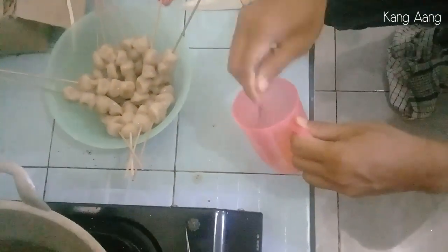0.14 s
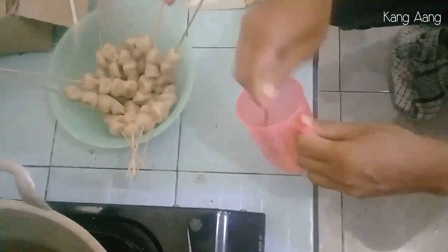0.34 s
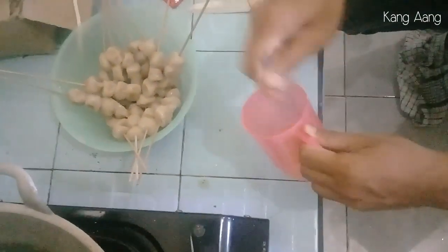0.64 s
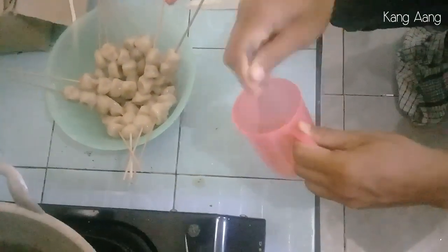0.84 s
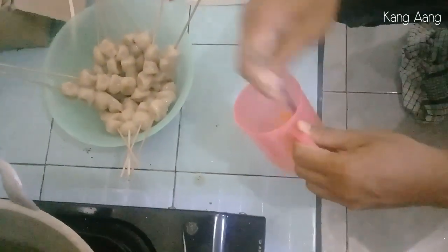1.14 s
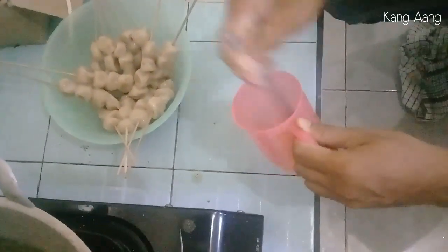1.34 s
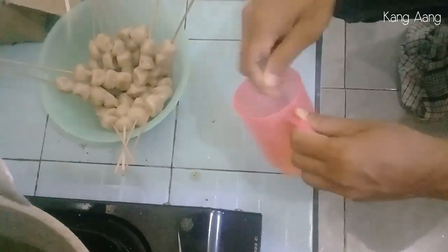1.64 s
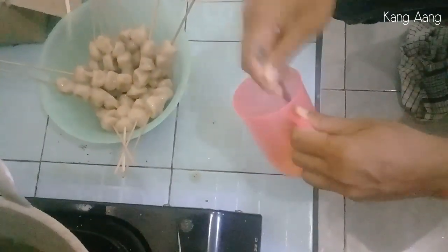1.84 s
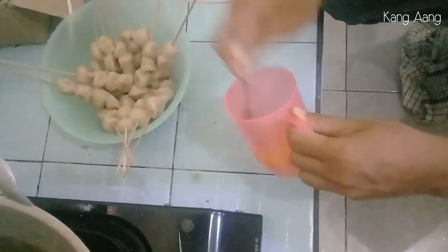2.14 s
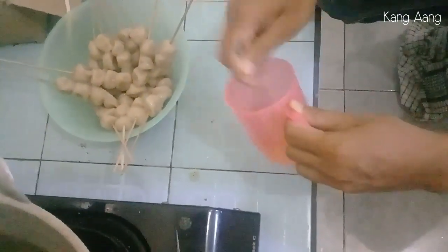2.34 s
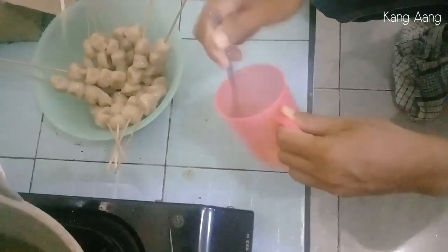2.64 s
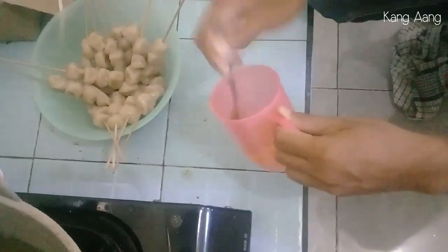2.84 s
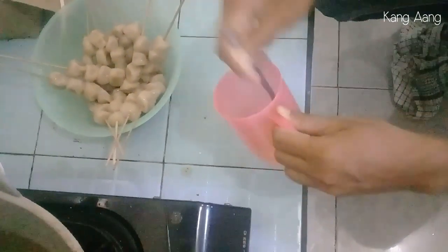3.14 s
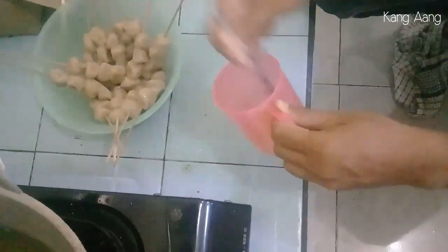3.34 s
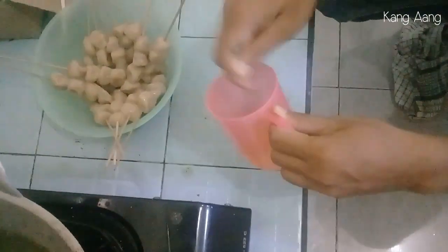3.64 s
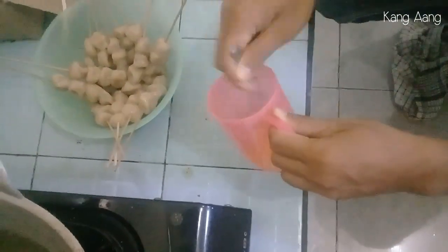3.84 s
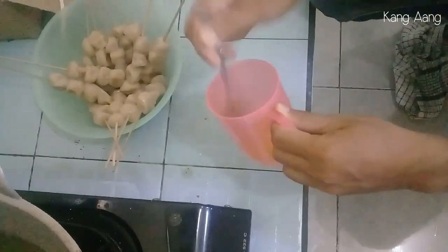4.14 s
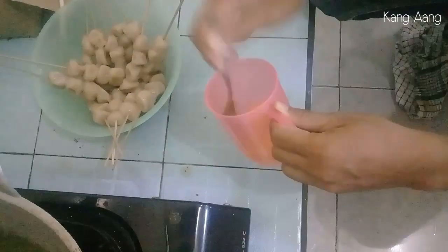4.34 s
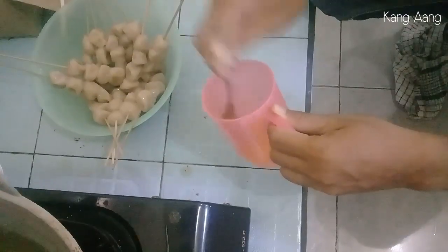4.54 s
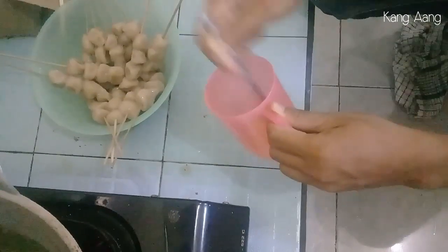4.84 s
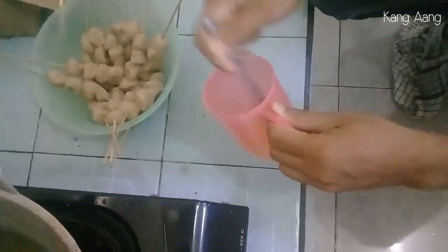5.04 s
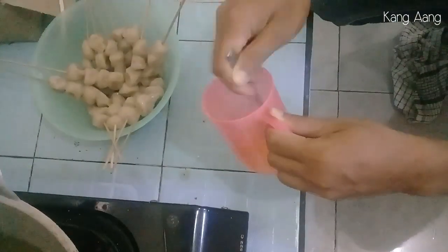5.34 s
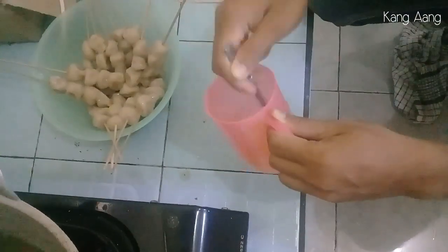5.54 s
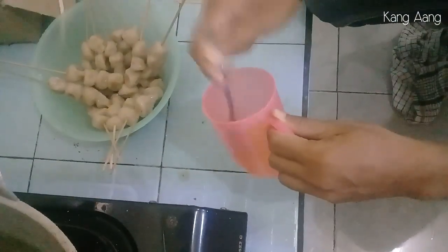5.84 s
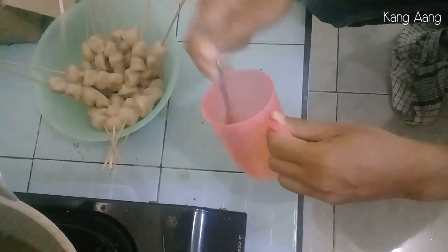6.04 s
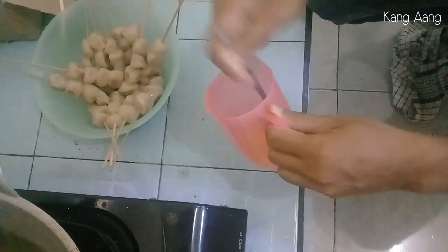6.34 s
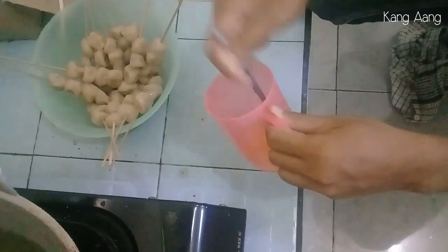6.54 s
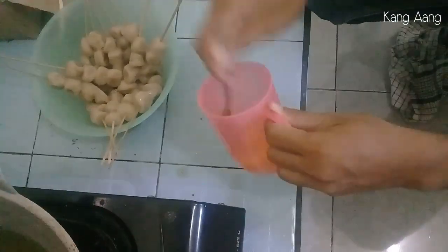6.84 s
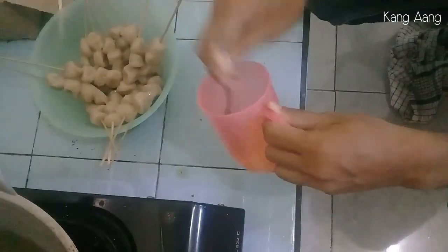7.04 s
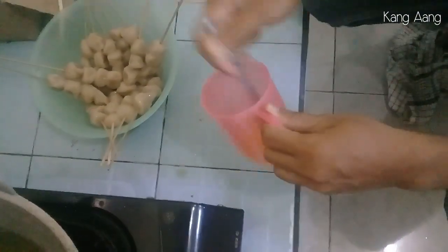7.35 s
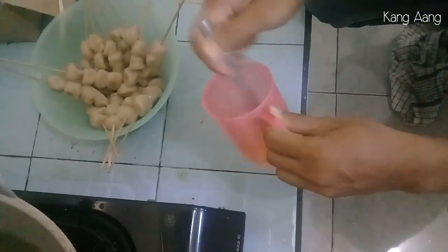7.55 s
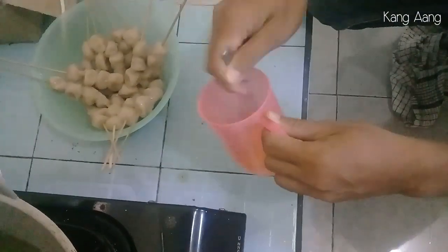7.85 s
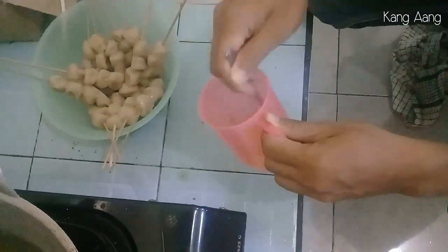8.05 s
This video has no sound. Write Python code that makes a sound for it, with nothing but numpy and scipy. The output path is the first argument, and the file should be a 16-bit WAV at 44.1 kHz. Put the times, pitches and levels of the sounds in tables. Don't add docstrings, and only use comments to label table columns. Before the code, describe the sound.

A fork beats egg in a handheld plastic cup, heard close up in a small tiled kitchen. Around five strokes a second knock the wall with dull plastic clacks and faint steel ticks, each pumping a hollow mid-pitched hoot from the cup. Wet plops, slaps and swishes fill the gaps. The pace stays steady throughout, slightly softer near the end, over a faint house hush.

```python
import sys
import numpy as np
from scipy import signal
from scipy.fft import rfft, irfft
from scipy.io import wavfile
from scipy.ndimage import uniform_filter1d

SR = 44100
rng = np.random.default_rng(int(sys.argv[2]) if len(sys.argv) > 2 else 0)


def master_out(mix):
    frames = np.transpose(np.atleast_2d(mix))
    ceiling = np.clip(frames, -1, 1)
    pcm = np.round(ceiling * 32767).astype(np.int16)
    wavfile.write(sys.argv[1], SR, pcm)


def voltage_ratio(decibels):
    exponent = np.asarray(decibels, float) / 20
    return 10 ** exponent


N = 360738
TOUCH = np.arange(2048) / SR

# [f/Hz, level/dB per Hz]
HUSH = [(15, -30), (30, -6), (70, 8.5), (160, 8.5), (500, -6.5), (2500, -6.5), (4300, -6.5), (12000, -18),
        (16000, -36)]
# [f/Hz, level/dB, t60/s]
KITCHEN = [(154, -59, 0.39), (261, -22.5, 0.45), (616, -17.5, 0.42), (1130, -20.5, 0.44), (2400, -32, 0.85),
           (4080, -23, 0.54), (9950, -56, 0.1)]
# [f/Hz, level/dB, t60/s]
BOOM = [(158.7, -64, 0.24), (209, -54.5, 0.96), (266.5, -46.5, 0.51), (407, -66, .4)]
# [t/s, f/Hz]
GRIP = [
    (0, 90),
    (2, 75),
    (4, 86),
    (5.35, 68),
    (5.7, 123),
    (6.15, 123),
    (6.5, 95),
    (8.2, 90),
]
# [t/s, peak level/dB, f/Hz]
SINGS = [
    (.2115, -26, 3020),
    (6.69, -21.5, 2890),
    (0.93, -48, 4500),
    (8.1, -44, 720),
    (1.108, -33, 1100),
]
# [t/s, effort level/dB, gurgle level/dB, air column f/Hz as the cup tilts (not used in the sound)]
SLOSH = [(0.0, 3, -63, 720), (.18, -1, -33.5, 686), (.34, 12.5, -43.5, 656.6), (1.32, -25, -51, 702.8),
         (1.5, -3.5, -32.5, 697.4), (1.96, -2, -38, 685), (3.05, -19, -38, 711), (3.48, 1, -36, 677.6),
         (4.67, 2.5, -35.5, 700.3), (5.06, 1, -44, 707), (5.439, -20, -38, 665), (5.97, 5, -46, 653),
         (6.15, -20, -88, 697), (6.31, -29, -38, 689.4), (7.38, -3, -43.5, 713), (8.18, -7, -48.5, 725)]
# [f/Hz, level/dB]
WALL = [(1080, -6.5), (1290, -47), (1500, -11), (1730, -0.5), (2060, 5), (2360, 10), (2600, -4.5),
        (2900, 8.5), (3100, -1), (3400, -1), (3800, 7)]
# [f/Hz, level/dB, t60/s]
HOOT = [(620, -29, 0.63), (669, -9.5, 0.18), (665, -8, 0.18), (708, -5, 0.21), (735, -15, 0.19),
        (796, -13.5, 0.61), (793, -10, 0.21), (829, -3.5, 0.21), (897, -2.5, 0.18), (963, -15, 0.69)]
# [f/Hz, level/dB, t60/s, swing direction]
NOOK = [(602.4, -34, .6, 1), (648.1, -16.8, .225, 1), (663.2, -24.4, .46, 1), (672.8, -23.8, .7, -1),
        (682.5, -20.1, .26, 1), (708, -30.1, .7, -1), (712.4, 0, .084, -1), (715.1, -6.1, .183, 1),
        (724.8, -21.7, .7, 1), (747.7, -9, .7, 1), (747.8, -8.9, .565, -1), (766.6, -30.1, .7, -1),
        (774.7, -35.4, .7, -1), (827.7, -40.5, .58, 1)]
# [f/Hz, level/dB, t60/s]
THUD = [(148, -47, 0.025), (283, -13, 0.11), (348, 6, 0.011)]
# [f/Hz, level/dB per Hz]
BRIGHT = [(2350, -1), (4000, -6), (4220, -4.5), (8700, -2.5), (9680, -7.5), (11800, -5.5), (13600, -14.5),
          (15300, -10.5), (16100, -45), (16500, -38)]
# [t/s, knock level/dB, knock centre f/Hz, steel tick level/dB, air pump level/dB]
STROKES = [(0.2102, -5.5, 2400, -25, -17.5), (.7023, -10.5, 1980, -25.5, -14),
           (.7492, -14, 2010, -25.5, -11.5), (0.9284, -10, 2450, -26.5, -10.5),
           (1.1065, -13, 1520, -26, -14.5), (1.284, -12.5, 2220, -23, -10.5),
           (1.3044, -10, 1870, -30.5, -19), (1.4625, -5.5, 2000, -21, -14.5), (1.6403, -7, 1700, -26, -9.5),
           (1.8332, -10, 2150, -28.5, -22.5), (2.0059, -9, 2230, -23, -15.5),
           (2.1904, -6, 2080, -23.5, -16.5), (2.3735, -4.5, 1830, -27, -12.5),
           (2.5502, -7.5, 1500, -24, -14.5), (2.7206, -13.5, 1620, -24, -19),
           (2.9072, -12, 1960, -25.5, -15), (3.0913, -1.5, 3030, -20, -28),
           (3.2864, -6.5, 2260, -21.5, -13.5), (3.4765, -12, 2150, -25.5, -12.5),
           (3.6643, -11, 2260, -29, -15), (3.847, -18.5, 2470, -24, -12), (4.0338, -8, 2400, -27.5, -13),
           (4.2218, -13.5, 1920, -27.5, -18), (4.4094, -4.5, 2200, -25, -13),
                (4.5955, -6.5, 2600, -24, -18.5), (4.783, -12, 2360, -24.5, -15),
                (4.974, -15, 3200, -25, -29), (5.1617, -7, 1730, -24.5, -15.5),
                (5.3458, -8.5, 1810, -28, -19.5), (5.5323, -8.5, 2400, -26, -20.5),
                (5.7223, -14.5, 2860, -33, -24.5), (5.7411, -10.5, 2150, -28.5, -59),
                (5.9191, -11, 2550, -26.5, -57), (6.0945, -11, 2150, -32, -20.5),
                (6.1328, -4.5, 2400, -20.5, -45), (6.3355, -4, 2400, -26.5, -29.5),
                (6.4936, -12.5, 2580, -29.5, -14.5), (6.6891, -6, 2900, -33, -21.5),
                (6.8768, -15, 2600, -29, -20), (7.0788, -17.5, 2720, -27, -27),
                (7.2744, -12.5, 2620, -22, -20.5), (7.4684, -20, 3020, -27, -32.5),
                (7.6485, -15.5, 2730, -26, -23.5), (7.849, -21, 3070, -27.5, -44),
                (8.0417, -15.5, 2360, -31, -28)]
# [t/s, air column f/Hz, plop level/dB, jolt level/dB, splash level/dB]
WAKES = [(0.21, 710, -23, -55, -31.5), (0.7, 691.3, -24, -40.5, -33.5), (0.75, 673, -21.5, -56, -34),
         (0.93, 676, -21, -60, -30.5), (1.11, 683, -21, -49, -33.5), (1.28, 728, -47, -68, -31),
         (1.3, 743.5, -28, -45, -33), (1.46, 735, -51, -47, -27.5), (1.64, 686, -19.5, -47, -32),
         (1.83, 670, -23.5, -47, -36), (2.01, 695, -19.5, -41, -28.5), (2.19, 696, -19.5, -46, -31.5),
         (2.37, 697, -41, -40.5, -28.5), (2.55, 687, -24.5, -43, -29.5), (2.72, 660, -27, -41, -30.5),
         (2.91, 707, -19, -47.5, -33), (3.09, 698, -28, -43, -25.5), (3.29, 704, -26.5, -49, -27),
         (3.48, 735, -20, -47, -36.5), (3.66, 699.5, -21, -51, -33), (3.85, 696, -22, -41, -36.5),
         (4.03, 678.6, -19, -46, -32.5),
         (4.22, 708, -24, -43, -34), (4.41, 706, -21, -51, -49), (4.6, 694.4, -21.5, -40, -32),
              (4.78, 691, -22, -59, -35), (4.97, 730, -47, -46, -35.5), (5.16, 714, -26, -42, -32),
              (5.35, 686, -24.5, -48, -32), (5.53, 678, -29, -46, -33), (5.72, 693, -62, -37, -32.5),
              (5.74, 734, -38, -49, -50), (5.92, 686, -39, -46, -40.5), (6.09, 693, -38, -51, -31),
              (6.13, 696, -29.5, -42, -26.5), (6.34, 725, -25, -43, -37), (6.49, 700.6, -28, -47, -33.5),
              (6.69, 702, -29.5, -43, -32.5), (6.88, 690, -25, -41, -34), (7.08, 734, -27.5, -41, -36.5),
              (7.27, 720, -21, -52, -34.5), (7.47, 719, -36, -48, -39), (7.65, 720, -33, -48, -37),
              (7.85, 720, -40, -58, -35.5), (8.04, 694, -29.5, -64, -33.5)]
# [t/s, knock level/dB, steel tick level/dB]
DIPS = [(0.0254, -33, -39), (0.3425, -20.5, -31), (0.4363, -24, -45), (0.5305, -26, -39), (1.093, -33, -32),
        (1.6057, -37, -38), (1.9739, -21, -36), (2.158, -24, -46), (2.3372, -24.5, -40), (2.358, -17, -31),
        (2.5176, -24, -39), (2.6779, -22.5, -39), (2.8589, -24.5, -37), (2.893, -23.5, -34),
        (3.0555, -30, -45), (3.6184, -25.5, -39), (4.2079, -20, -32), (4.3673, -24, -40), (4.748, -25, -36),
        (4.935, -26, -39), (6.1218, -30, -38), (6.4405, -20.5, -31.5), (6.6386, -25.5, -37.5),
        (6.6765, -24, -28), (6.842, -27.5, -37), (7.0445, -28.5, -38), (7.433, -29, -49),
        (7.6225, -26, -33), (7.805, -27.5, -52), (7.9992, -30.5, -48)]
# [t/s, knock level/dB, knock centre f/Hz, steel tick level/dB]
GRAZES = [(0.154, -24, 2150, -35), (0.2332, -25, 2920, -63), (.379, -27, 2210, -31),
          (.393, -22.5, 2320, -29), (0.043, -28, 2410, -39), (0.883, -32, 2020, -63), (.48, -29, 1910, -37),
          (.56, -27, 2010, -34), (0.634, -27, 2150, -41), (3.25, -27, 2520, -41), (4.182, -25, 2500, -37),
          (4.402, -19, 2220, -36), (4.646, -25, 2250, -50), (2.211, -24, 2200, -41),
          (5.555, -16, 2020, -38), (6.323, -18, 1690, -47), (0.5741, -21, 3000, -28),
          (1.486, -12, 2200, -50), (1.995, -19, 2490, -30), (2.4187, -13, 2400, -41),
          (3.592, -24, 2330, -37), (3.6427, -22, 2720, -36), (3.879, -21.5, 2330, -50),
          (4.4548, -17, 2300, -41), (4.586, -25, 2400, -35), (4.6636, -25, 2150, -34.5),
          (4.768, -19.5, 2610, -31), (4.963, -22.5, 2510, -39), (5.1446, -29, 2400, -68),
          (5.3004, -26, 2300, -42), (5.992, -27.5, 2340, -34), (6.305, -22, 2880, -30),
          (6.623, -31, 2413, -44), (6.9209, -21.5, 2520, -43), (6.9796, -31, 2380, -41),
          (7.073, -19, 2180, -31), (7.267, -19.5, 2270, -47), (7.565, -28.5, 2300, -55),
          (7.79, -33, 2300, -48), (7.702, -22.5, 2680, -40)]
# [t/s, peak level/dB, f/Hz]
SURGES = [(.04, -36, 794), (.21, -12, 885), (.437, -25, 664), (.615, -24, 726), (1.33, -18, 733),
          (1.387, -20.5, 784), (1.836, -15, 885), (1.974, -19, 695), (2.0, -19.5, 704), (2.087, -40, 670),
          (2.337, -23, 678), (2.575, -24, 700), (3.368, -35, 696), (3.41, -33, 735), (3.524, -28, 734),
          (3.602, -26, 706), (4.06, -25, 727), (4.469, -30, 670), (4.585, -26, 708), (4.768, -23, 707),
          (5.723, -18.5, 840), (6.307, -19.5, 704), (6.323, -18.5, 673), (6.675, -25, 660),
          (7.045, -48, 726), (8.042, -22.5, 837), (7.8, -35, 716)]
# [t/s, peak level/dB]
SPITS = [(.103, -43), (0.164, -41), (0.205, -26), (0.363, -36), (0.562, -35), (0.625, -40), (.66, -42),
         (0.73, -30), (1.897, -40), (2.086, -34), (2.224, -36), (4.299, -34), (6.985, -45), (7.243, -49),
         (7.514, -40), (7.562, -43), (7.751, -43), (8.053, -41)]
# [t/s, peak level/dB]
SWISHES = [(0.027, -45), (0.156, -56), (0.272, -37), (0.344, -43), (0.391, -40), (0.451, -41), (0.574, -53),
           (0.629, -37), (0.887, -52), (1.069, -57), (1.189, -43), (1.365, -40), (1.494, -34), (1.55, -43),
           (1.608, -48), (1.731, -40), (1.785, -45), (1.908, -39), (2.089, -34.5), (2.16, -53),
           (2.278, -38), (2.457, -36.5), (2.521, -47), (2.629, -39), (2.68, -48), (2.809, -42),
           (2.861, -46), (2.987, -40.5), (3.058, -47), (3.181, -37), (3.563, -38.5), (3.644, -42),
           (3.751, -40), (3.933, -37), (4.113, -39.5), (4.186, -45), (4.302, -44), (4.49, -43),
           (4.665, -48), (4.867, -40), (5.059, -41), (5.127, -49), (5.627, -44.5), (5.818, -45),
           (5.996, -44), (6.189, -34), (6.306, -46), (6.443, -50), (6.578, -46), (6.98, -44), (7.043, -52),
           (7.241, -47), (7.436, -49), (7.562, -43), (7.623, -52), (7.703, -44), (7.747, -41), (7.809, -46),
           (8.002, -49), (8.131, -43),
           (1.02, -56), (3.37, -45), (3.995, -43), (4.065, -46), (5.25, -42), (5.439, -50), (6.39, -52),
           (6.78, -48), (7.171, -41), (7.36, -51), (7.94, -46)]

WALL_TOP_HZ, WALL_T60_S = 3200, .013
TICK_LEAD_S, PUMP_LAG_S, COLUMN_START = 0.001216, -0.00047, 0.97
STROKE_PLOP_DB, STROKE_PLOP_HZ = 1, 373.3
DIP_HZ, DIP_PLOP_DB, DIP_PLOP_HZ, GRAZE_PLOP_DB = 2150, -1.5, 477, -15.5
COLUMN_DB, COLUMN_T60_S, COLUMN_WOBBLE, FLUTTER_DB = -7.5, 0.47, .03, 5.5
CLIMB, CLIMB_S = .11, .11
SHALLOW_HZ, SHALLOW_T60_S = 800, 0.42
LOOSE_DB, NOOK_TILT_DB, LEAN_LIMIT_DB = -12, 7, 8.5
SMOTHER_S, SMOTHER_T60_S = 0.15, 0.35


def unit(x):
    return x / np.abs(x).max(axis=-1, keepdims=True)


def level(x, db):
    return x * voltage_ratio(db) / np.sqrt(np.mean(x ** 2))


def butter(x, order, hz, kind="low"):
    return signal.sosfilt(signal.butter(order, hz, kind, fs=SR, output="sos"), x)


def colour(x, spectrum):
    hz, db = np.transpose(spectrum)
    bins = np.fft.rfftfreq(x.shape[-1], 1 / SR) + 1
    return irfft(rfft(x) * voltage_ratio(np.interp(np.log(bins), np.log(hz), db)), x.shape[-1])


def decay(t, t60):
    return (t >= 0) * np.exp(-np.log(1000) * np.maximum(t, 0) / t60)


def rings(modes, t):
    hz, db, t60 = np.transpose(modes)[:, :, None]
    return voltage_ratio(db) * decay(t, t60) * np.sin(2 * np.pi * hz * t)


def wander(shape, hold, smooth):
    return uniform_filter1d(np.repeat(rng.standard_normal(shape), hold, axis=-1), smooth)


def place(at_s, db, grains):
    margin = 400
    out = np.zeros(N + grains.shape[1] + margin)
    for s, gain, grain in zip(at_s, voltage_ratio(db), grains):
        i = max(int(s * SR) + margin - 176, 0)
        out[i:i + len(grain)] += gain * grain
    return out[margin:N + margin]


def drops(per_s, scatter_db):
    hits = rng.standard_normal(N) * (rng.random(N) < per_s / SR)
    return hits * voltage_ratio(scatter_db * np.minimum(rng.exponential(size=N), 3))


def stirred(events, t60):
    at_s, db = np.transpose(events)[:2]
    t = np.arange(SR // 2) / SR - .004
    shape = (decay(t, t60) * (1 - decay(t, 0.03))) ** 2
    jumps = place(at_s, 2 * db, np.ones((len(at_s), 1)))
    return np.sqrt(np.abs(signal.fftconvolve(jumps, shape)[176:N + 176]))


def favour(modes, hz, octaves, depth_db, scatter_db):
    near = np.log2(np.array(modes)[:, 0] / hz[:, None]) / octaves
    return voltage_ratio(-depth_db * np.minimum(near ** 2, 1.5) + scatter_db * rng.standard_normal(near.shape))


def blotchy(grains, scatter_db):
    blotch = np.repeat(rng.standard_normal((len(grains), 33)), 32, axis=1)[:, :len(TOUCH) // 2 + 1]
    bumps = voltage_ratio(scatter_db * uniform_filter1d(blotch, size=24))
    return unit(irfft(rfft(colour(grains, BRIGHT)) * bumps))


def gestures():
    at, knock, hz, tick, pump = np.transpose(STROKES)
    _, pitch, plop, jolt, splash = np.transpose(WAKES)
    dip_at, dip, dip_tick = np.transpose(DIPS)
    graze_at, graze, graze_hz, graze_tick = np.transpose(GRAZES)
    every_s = np.r_[at, dip_at, graze_at]
    plop_db = np.r_[STROKE_PLOP_DB + plop - knock, DIP_PLOP_DB + 0 * dip, GRAZE_PLOP_DB + 0 * graze]
    plop_hz = np.r_[STROKE_PLOP_HZ + 0 * at, DIP_PLOP_HZ + 0 * dip, STROKE_PLOP_HZ + 0 * graze]
    plop_hz = plop_hz * (1 + 0.086 * rng.standard_normal(len(every_s)))
    knock_hz = np.r_[hz, DIP_HZ + 0 * dip, graze_hz]
    knocks = np.c_[every_s, np.r_[knock, dip, graze], knock_hz, plop_db, plop_hz]
    ticks = np.r_[np.c_[every_s - TICK_LEAD_S, np.r_[tick, dip_tick, graze_tick]], SPITS]
    pumps = np.r_[np.c_[at + PUMP_LAG_S, pump, COLUMN_START * pitch], SURGES]
    slaps = np.c_[every_s, np.r_[splash + 21.5, dip, graze]]
    return knocks, ticks, pumps, slaps, np.c_[at, jolt]


def house_hush(jolts):
    hush = level(colour(rng.standard_normal(N), HUSH), -62.5)
    return hush * (1 + voltage_ratio(51.0) * stirred(jolts, 0.21))


def kitchen(x):
    t = np.arange(SR) / SR
    tail = 0
    for hz, db, t60 in KITCHEN:
        octave = butter(rng.standard_normal(SR), 2, [hz / np.sqrt(2), hz * np.sqrt(2)], "band")
        tail = tail + voltage_ratio(db) * decay(t - .006, t60) * octave
    lines = rfft(tail, 2 * SR)
    even = np.sqrt(uniform_filter1d(np.abs(lines) ** 2, size=300))
    tail = irfft(lines * np.minimum(1, even / np.abs(lines)))[:SR] + rings(BOOM, t).sum(axis=0)
    fade_in = np.minimum(t / 0.014, 1)
    return signal.fftconvolve(x, tail * voltage_ratio(-14) * fade_in)[:N]


def thump(jolts):
    at_s, db = jolts.T
    t = np.arange(4096) / SR - .004
    scatter = 1 + 0.15 * np.tanh(rng.standard_normal((len(at_s), 1)))
    hz = np.interp(at_s, *np.transpose(GRIP))[:, None] * scatter
    puff = decay(t, 0.12) * (1 - decay(t, 0.015)) * np.sin(2 * np.pi * hz * t)
    return place(at_s, db - 7, unit(puff))


def sing():
    at_s, db, hz = np.transpose(SINGS)[:, :, None]
    t = np.arange(SR // 2) / SR - .004
    rough = butter(rng.standard_normal((len(hz), len(t))), 2, 87)
    ring = (.5 + rough / rough.std()) * np.sin(2 * np.pi * hz * t)
    return place(at_s[:, 0], db[:, 0], unit(ring * decay(t, 0.48)))


def egg_splash():
    splash = 0
    for hz, db in WALL:
        blobs = uniform_filter1d(np.abs(drops(1300, 3.4)), size=260) * rng.standard_normal(N)
        drift = wander(N // 5000 + 1, 5000, 3000)[:N]
        turns = np.cumsum(hz * (1 + .05 * drift)) / SR
        swell = signal.lfilter([1], [1, -decay(1 / SR, WALL_T60_S)], blobs)
        splash = splash + voltage_ratio(db) * swell * np.sin(2 * np.pi * turns)
    return level(butter(splash, 6, WALL_TOP_HZ), 0)


def egg_gurgle():
    blobs = uniform_filter1d(np.abs(drops(200, 4.0)), size=300) * rng.standard_normal(N)
    answer = rings(HOOT + THUD, TOUCH).sum(axis=0) * decay(TOUCH, 0.075)
    return butter(level(signal.fftconvolve(blobs, answer)[:N], -11.0), 6, WALL_TOP_HZ)


def egg_spray():
    spray = 0
    for hz in 4000 * 2 ** np.arange(0, 2.1, .25):
        flicker = wander(N // 700 + 1, 700, 500)[:N]
        hiss = butter(drops(6000, 1.5), 1, [hz / 1.07, hz * 1.07], "band")
        spray = spray + voltage_ratio(4 * flicker) * hz ** -.3 * hiss
    return level(colour(spray, BRIGHT), -28.5)


def egg(knocks, slaps, ticks):
    s, effort_db, gurgle_db, _ = np.transpose(SLOSH)
    t = np.arange(N) / SR
    sheet = level(butter(drops(2500, 2.2), 1, [3600, 5600], "band"), -46.0) * stirred(knocks, 0.35)
    slosh_gain = voltage_ratio(np.interp(t, s, effort_db) - 57.5) + voltage_ratio(-24.0) * stirred(slaps, 0.41)
    splash = slosh_gain * egg_splash()
    spray = egg_spray() * stirred(ticks, 0.56)
    gurgle = voltage_ratio(np.interp(t, s, gurgle_db)) * egg_gurgle()
    return sheet + splash + spray + gurgle


def loose_air(hz, t):
    pop = decay(t, 0.05) * np.sin(2 * np.pi * hz * t * (1 + 1.46 * t)) * (1 - decay(t, 0.0033))
    signs = rng.choice([-1, 1], (len(hz), len(HOOT)))
    ring = signs * favour(HOOT, hz[:, 0], 0.17, 1.3, 1.4) @ rings(HOOT, t)
    wobble = wander((2, len(hz), 28), 630, 600)
    climb = .97 + CLIMB * (1 - np.exp(-np.maximum(t, 0) / CLIMB_S)) + COLUMN_WOBBLE * wobble[0]
    flutter = voltage_ratio(FLUTTER_DB * np.minimum(wobble[1], .5))
    column = decay(t, COLUMN_T60_S) * np.sin(2 * np.pi * np.cumsum(hz * climb, axis=1) / SR) * flutter
    rush = unit(butter(rng.standard_normal(len(t)), 2, [720, 980], "band") * decay(t, SHALLOW_T60_S))
    body = np.where(hz < SHALLOW_HZ, unit(ring) + voltage_ratio(COLUMN_DB) * unit(column), 0.95 * rush)
    return unit(pop + .5 * body * (1 - decay(t, 0.014)))


def nook_answer(hz, t):
    modes = np.array(NOOK)
    lean_db = NOOK_TILT_DB * np.log2(hz / 690) * np.log2(modes[:, 0] / 700) / .01
    lean = voltage_ratio(np.clip(lean_db, -LEAN_LIMIT_DB, LEAN_LIMIT_DB))
    smother = decay(np.maximum(t - SMOTHER_S, 0), SMOTHER_T60_S)
    return unit(lean * modes[:, 3] @ rings(modes[:, :3], t) * smother)


def hoot(pumps):
    at_s, db, hz = pumps.T
    hz = hz[:, None]
    t = np.arange(28 * 630) / SR - .004
    loose = loose_air(hz, t)
    deep = unit(nook_answer(hz, t) + voltage_ratio(LOOSE_DB) * loose)
    return place(at_s, db - 6.0, np.where(hz < SHALLOW_HZ, deep, loose))


def contact(length_s, graze_db=-18):
    chance = rng.standard_normal((len(length_s), len(TOUCH)))
    t = TOUCH - .004
    chance = np.where(decay(t, .002) > .1, 1.5 * np.sign(chance), chance)
    graze = voltage_ratio(graze_db) * decay(t + 0.017, 0.013)
    landing = (t >= 0) * np.exp(-(np.maximum(t, 0) / length_s[:, None]) ** 2)
    return chance * (graze + landing)


def tines(steel, swishes):
    at_s, db = steel.T
    push = contact(np.full(len(at_s), .005), graze_db=-60)
    ticks = butter(place(at_s, db - 0.5, blotchy(push, 2.5)), 1, 8650)
    at_s, db = swishes.T
    swell = np.exp(-((TOUCH - .023) / .011) ** 2) * rng.standard_normal((len(at_s), len(TOUCH)))
    swell = swell * voltage_ratio(4.1 * np.repeat(rng.standard_normal((len(at_s), 32)), 64, axis=1))
    return ticks + place(at_s - .019, db + 1.5, blotchy(swell, 4))


def wall(count, t):
    hz, db = np.transpose(WALL)[:, :, None]
    bend = 1 + .035 * rng.standard_normal((count, len(WALL), 1))
    return voltage_ratio(db) * decay(t, WALL_T60_S) * np.sin(2 * np.pi * hz * bend * t)


def fork(knocks):
    at_s, db, hz, plop_db, plop_hz = knocks.T
    push = contact(0.0079 * voltage_ratio(0.019 * db + 0.27 * rng.standard_normal(len(at_s))))
    soft = butter(push * np.abs(push), 6, WALL_TOP_HZ)
    soft = butter(soft, 3, 1150, "high")
    shares = favour(WALL, hz, .3, 11, 2)[:, :, None]
    body = np.sum(shares * wall(len(at_s), TOUCH[:512]), axis=1)
    knock = signal.fftconvolve(soft, body, axes=1)[:, :len(TOUCH)]
    t = TOUCH - .004
    plop = decay(t, 0.037) * np.sin(2 * np.pi * plop_hz[:, None] * t * (1 + 10.2 * t))
    plop = plop + .5 * voltage_ratio(3.5 * rng.standard_normal((len(at_s), len(THUD)))) @ rings(THUD, t)
    return place(at_s, db - 5.5, unit(knock)) + place(at_s, db + plop_db - .5, unit(plop))


def scene():
    knocks, ticks, pumps, slaps, jolts = gestures()
    cup = fork(knocks) + tines(ticks, np.array(SWISHES)) + egg(knocks, slaps, ticks) + sing()
    air = hoot(pumps)
    room = kitchen(cup + 0.18 * air)
    beating = butter(cup + air + room, 2, 259, "high")
    return (beating + thump(jolts) + house_hush(jolts))[None]


def band_limit(x):
    return signal.sosfilt(signal.butter(12, 16650, fs=SR, output="sos"), x)


def record(dry):
    rounded = np.tanh(1.393 * dry) / 0.99
    rolloff = signal.ellip(5, .5, 24, 15900, fs=SR, output="sos")
    mix = signal.sosfilt(rolloff, rounded)
    return band_limit(mix)


dry = scene()
out = record(dry)
master_out(out)
```